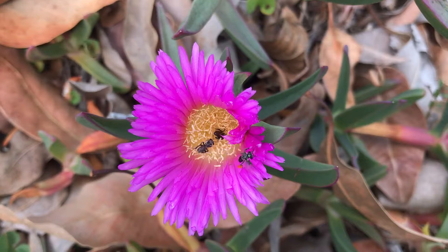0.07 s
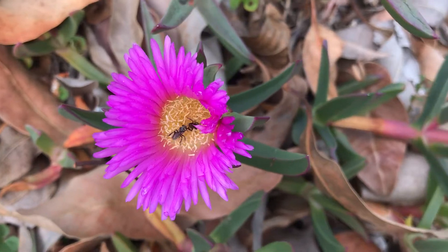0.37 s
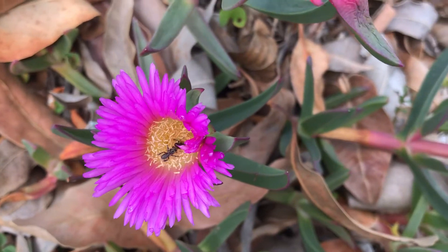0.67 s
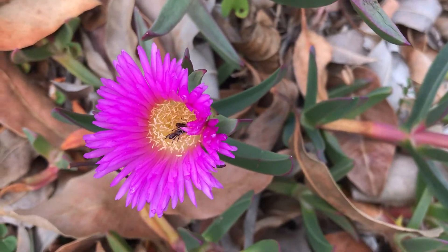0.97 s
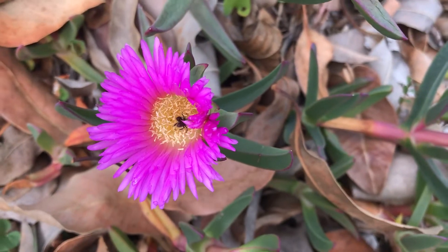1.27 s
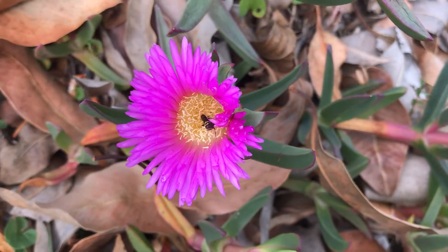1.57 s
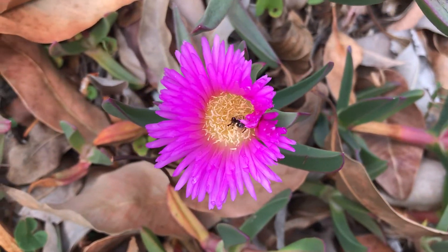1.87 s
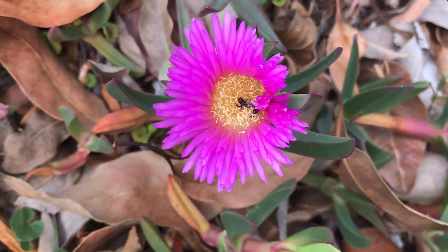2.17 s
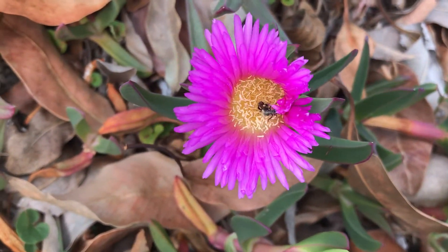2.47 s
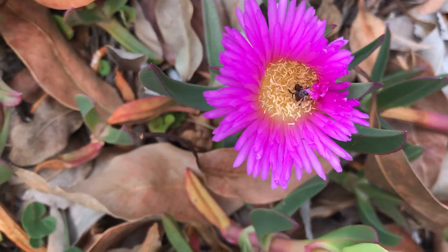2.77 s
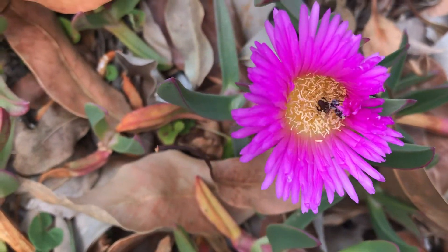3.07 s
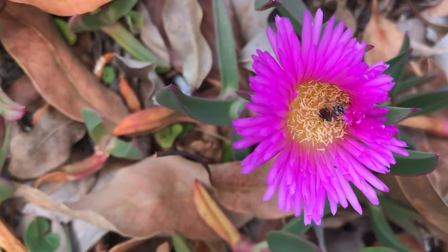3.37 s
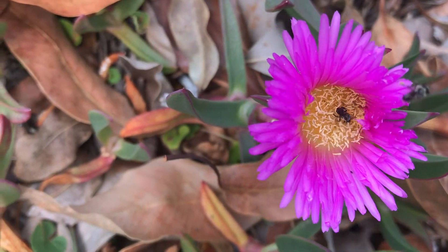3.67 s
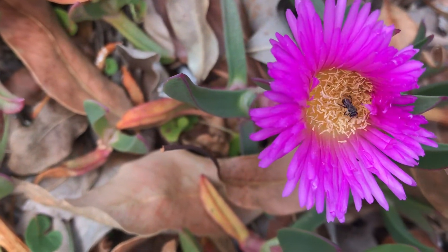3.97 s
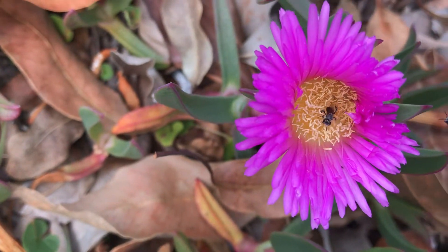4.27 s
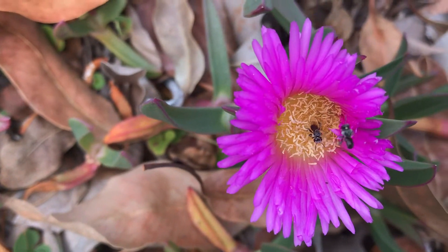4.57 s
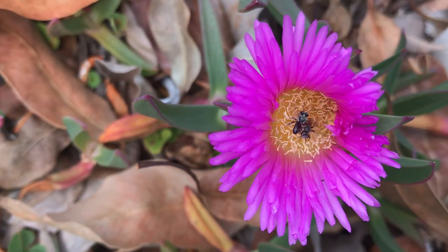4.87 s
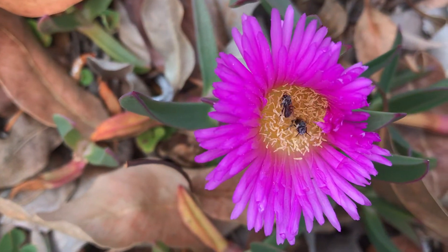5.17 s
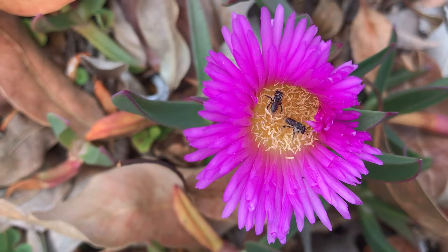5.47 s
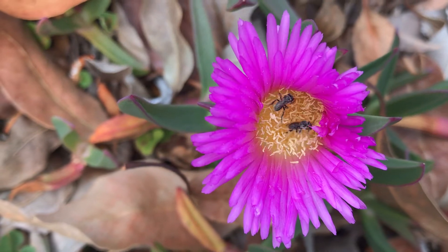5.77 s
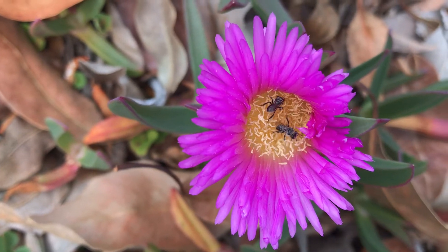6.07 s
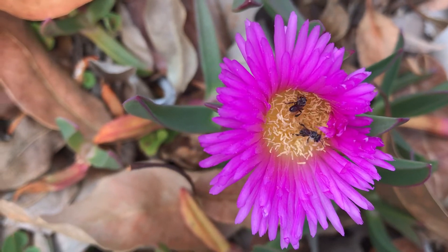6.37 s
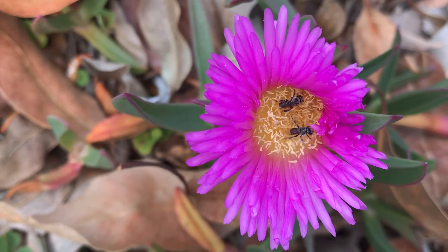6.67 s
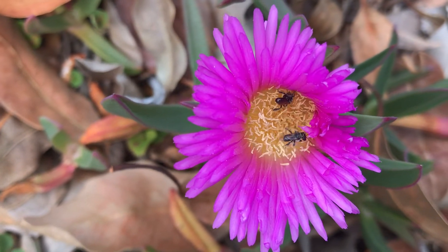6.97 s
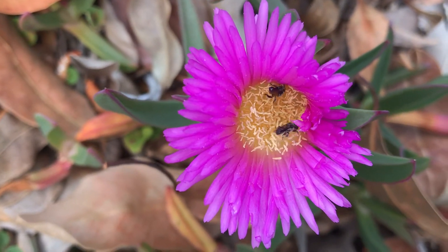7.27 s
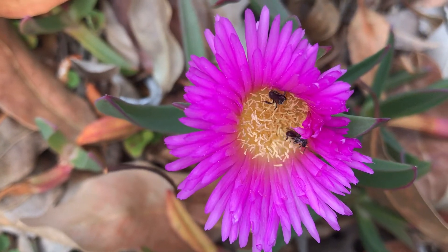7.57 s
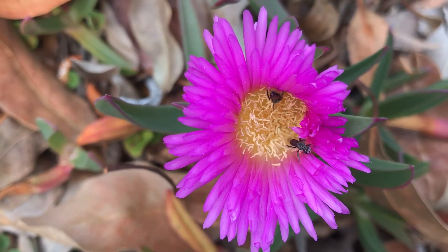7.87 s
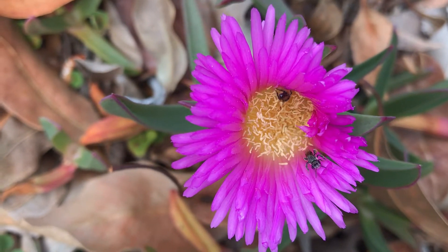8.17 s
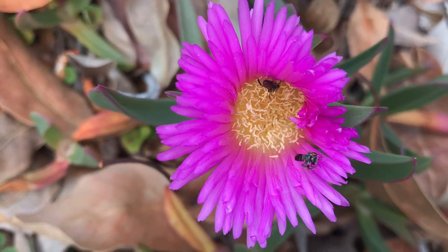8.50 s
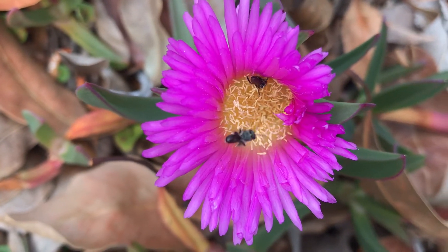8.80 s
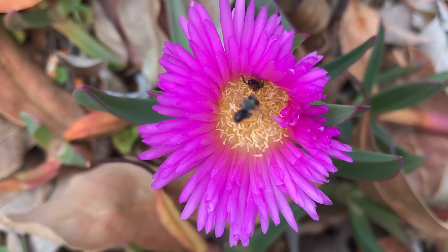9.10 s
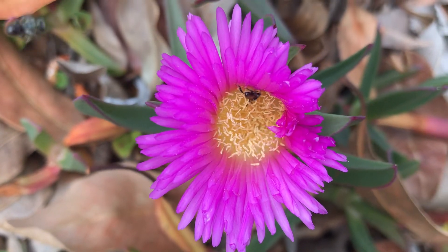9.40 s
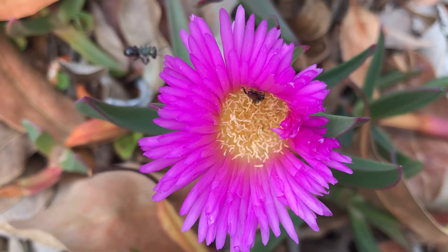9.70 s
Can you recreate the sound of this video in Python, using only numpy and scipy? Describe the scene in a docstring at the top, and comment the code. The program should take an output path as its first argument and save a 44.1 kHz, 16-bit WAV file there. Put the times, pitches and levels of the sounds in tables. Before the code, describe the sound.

A quiet garden opens on a passing vehicle, its low engine rumble, tyre roar and hiss peaking within the first second. A softer vehicle follows around 2 seconds, and the traffic gradually sinks into a steady murmur of far roads under a thin hiss. A small bird gives a quick cluster of clear chirps at about 1.3 seconds, with much fainter ones near 4, 6 and 8 seconds. Dry leaves tick and scrape very softly now and then, mostly between 1 and 3.5 seconds. From about 4 to 7 seconds a distant crow caws five times, faint and slightly echoing. At around 8.5 seconds a small bee takes off, its quiet, wavering buzz lasting to the end. Over it, a bird gives a short fluttering rasp at about 9.3 seconds, followed by one high chirp.

```python
"""Quiet garden with passing traffic

Engine rumble and tyre roar swell as vehicles pass, then sink into the murmur of far roads under a thin
hiss. Small birds whistle short chirps and one flutter-chopped rasp. Dry leaves tick and scrape, a far
crow caws through a resonant throat, and near the end a small bee takes off on buzzing wings."""
import sys
import numpy as np
from scipy import signal
from scipy.fft import rfft, irfft
from scipy.io import wavfile
from scipy.ndimage import uniform_filter1d

SR = 44100
rng = np.random.default_rng(int(sys.argv[2]) if len(sys.argv) > 2 else 0)


def file_out(sig):
    """Save sig as 16-bit WAV at sys.argv[1]."""
    # one column per channel
    cols = np.atleast_2d(sig).T
    # limit, then scale
    lim = np.clip(cols, -1, 1)
    pcm = np.round(lim * 32767).astype(np.int16)
    wavfile.write(sys.argv[1], SR, pcm)


N = 438354
TIME_S = np.arange(N) / SR

# vehicles: nearest t/s, time to cover the nearest distance/s, engine/dB, tyres/dB, deep rumble/dB
VEHICLES = [(.68, .48, -34, -43, -51), (2.3, 0.64, -47, -66, -58.5), (5.1, 0.64, -54.5, -74, -84),
            (8.3, 1.1, -67.5, -76, -60)]
# noise spectra: f/Hz, relative density/dB
DEEP_SPECTRUM = [(12, -32), (28, -14), (40, -6), (52, -1), (68, -5), (110, -35), (400, -73)]
ENGINE_NEAR = [(20, -41), (40, -29), (55, -14.5), (75, -8), (105, -4.5), (138, -9.5), (156, -9.5),
               (180, -7), (225, -8), (270, -15), (330, -16.5), (400, -20.5), (600, -35.5), (1200, -61)]
ENGINE_FAR = [(20, -37), (42, -18), (60, -3), (100, 0), (155, -6.5), (200, -3.5), (250, -12), (340, -12.5),
              (440, -26), (600, -20.5), (800, -33.5), (1200, -58)]
TYRE_NEAR = [(150, -44), (400, 2.5), (600, 0), (800, -1), (1150, 1.5), (1600, -3), (2500, -4), (3400, -13),
             (5500, -17.5), (8000, -28.5), (15000, -50)]
TYRE_FAR = [(150, -9.5), (400, 1), (600, -0.5), (820, -4.5), (1100, 0.5), (1350, -0.5), (1650, -1.5),
            (2100, -5.5), (2500, -6.5), (2800, -9.5), (4500, -17.5), (6300, -21), (8000, -28), (15000, -43)]
AIR_SPECTRUM = [(1500, -1.5), (4000, 3), (6300, 0.5), (7800, -3), (9600, 2), (10400, -5), (11500, 0),
                (13500, -3.5), (15800, -5.5)]
# engine drones: f/Hz, width/Hz, relative level/dB
DRONES = [(59.4, 1.1, -18), (97.2, 3.8, -8.5), (131.4, 19, -12.5), (217.5, 4.4, -9), (233.2, 3.5, -18)]
# tread whine: f/Hz, width/Hz, lift/dB
TREAD_PEAKS = [(875, 69, 4.5), (1087, 40, 5)]
# near vehicle's hiss: nearest t/s, time to cover the nearest distance/s, level/dB, loss per doubling/dB
HISS_PASS = (0.37, 0.2155, -52.5, 7)
# bird notes: t/s, length/s, start f/Hz, middle f/Hz, end f/Hz, level/dB, overtones/dB, roughness/0-1
CHIRPS = [(1.293, 0.047, 2755, 2836, 2680, -41, -25, 0.07), (1.335, .022, 2820, 2770, 2640, -50, -40, .3),
          (1.365, 0.0336, 3840, 3540, 3520, -47, -33, 0.54),
          (3.878, 0.0427, 2250, 2370, 2220, -61, -2.5, 0.6), (4.505, .035, 4370, 4550, 4450, -78, -30, .5),
          (5.92, 0.069, 2530, 2480, 2140, -72, -30, 0.15), (5.958, 0.07, 2240, 1740, 1500, -63.5, -30, 0),
          (6.01, .068, 3020, 2420, 2160, -70.5, -27, 0.78), (6.34, 0.055, 2190, 2464, 2420, -66, -5, 0.7),
          (7.769, 0.048, 2270, 2424, 2310, -64, -5, 0.6),
          (9.547, 0.0345, 3800, 4100, 4110, -56.5, -23, 0.33)]
# leaf scrapes: t/s, length/s, level/dB, centre f/Hz, width/octaves
LEAF_SCRAPES = [(1.339, 0.003, -58, 13000, 0.7), (1.372, 0.029, -62.5, 12000, 0.94),
                (1.8, .7, -82, 13000, 0.06), (1.923, 0.036, -68, 4500, .8), (2.108, 0.081, -64, 4940, 0.88),
                (2.335, .060, -72.5, 7500, .8), (2.5, 0.1, -69, 4500, 0.77), (2.892, 0.0041, -67, 7800, .4),
                (3.255, 0.0023, -58.5, 11000, 0.68), (3.515, .075, -76.5, 14000, 0.25),
                (3.52, .07, -76, 5536, .4), (4.592, 0.43, -80.5, 12900, .27),
                (4.648, 0.41, -82, 6000, 0.14), (6.622, .240, -83, 5960, .15),
                (6.888, 0.05, -77, 8500, 0.77), (8.588, .014, -80, 12000, 0.91),
                (8.612, 0.38, -91, 12000, .4)]
# caws: t/s, length/s, f/Hz, level/dB
CAWS = [(4.16, 0.16, 381, -71), (4.699, 0.22, 390, -71), (5.399, 0.16, 381, -67), (6.051, .18, 382, -65.5),
        (6.63, 0.19, 382.5, -65)]
# crow's throat response: f/Hz, gain/dB
CROW_THROAT = [(400, -35), (1150, -10), (1520, 2.5), (1920, -4), (2300, -16), (3100, -15)]
# wingbeat harmonics: multiple, relative level/dB
WING_HARMONICS = [(1, -0.5), (2, -7), (3, -17.5), (4, -27), (5, -24), (6, -38), (7, -23)]
# bee's darts: t/s, added wingbeat/Hz
DARTS = [(9.599, 14), (9.83, 16)]
# wall echoes: delay/s, level/dB
WALL_ECHOES = [(0.023, -27), (.098, -16), (.116, -20.5)]


def gain_of(db):
    """Decibels to amplitude."""
    return 10 ** (np.asarray(db) / 20)


def unit_rms(x):
    """Scales to rms 1."""
    return x / np.sqrt(np.mean(x ** 2) + 1e-20)


def spectrum_db(points, hz):
    """Interpolates a spectrum over log frequency."""
    points_hz, db = np.transpose(points)
    return np.interp(np.log(hz + 1), np.log(points_hz + 1), db)


def add(mix, start_s, sound):
    """Mixes a sound in at start_s."""
    part = mix[round(start_s * SR):][:len(sound)]
    part += sound[:len(part)]


def bump(centre_s, width_s):
    """Gaussian of height 1."""
    return np.exp(-.5 * ((TIME_S - centre_s) / width_s) ** 2)


def wander(rate_hz):
    """Smooth random drift, rms 1."""
    steps = 2 ** 15
    hz = np.fft.rfftfreq(steps, TIME_S[-1] / steps)
    slow = unit_rms(irfft(rfft(rng.standard_normal(steps)) * np.exp(-(hz / rate_hz) ** 2)))
    return np.interp(TIME_S, np.linspace(0, TIME_S[-1], steps), slow)


def noise(spectrum, patchy_db, peaks=(), size=1024):
    """Shaped noise, rms 1, with resonant peaks and drifting patches of level."""
    frames = dict(nperseg=size, noverlap=size * 3 // 4)
    hz, _, bins = signal.stft(rng.standard_normal(N), SR, **frames)
    patches = uniform_filter1d(rng.standard_normal(bins.shape), size=9, axis=0)
    patches = unit_rms(uniform_filter1d(patches, size=14, axis=1))
    peaks_db = sum(lift * np.exp(-.5 * ((hz - f) / width) ** 2) for f, width, lift in peaks)
    db = spectrum_db(spectrum, hz) + peaks_db
    shaped = bins * gain_of(db[:, None] + patchy_db * patches)
    return unit_rms(signal.istft(shaped, SR, **frames)[1][:N])


def passing(nearest_s, crossing_s, db, doubling_db):
    """Amplitude of a source at steady speed on a straight road; loses doubling_db per distance doubling."""
    distance = np.hypot(1, (TIME_S - nearest_s) / crossing_s)
    return gain_of(db - doubling_db * np.log2(distance))


def road(levels_db, doubling_db, lead_s=0):
    """Joint amplitude of all vehicles, summed in power."""
    return np.sqrt(sum(passing(nearest_s - lead_s, crossing_s, db, doubling_db) ** 2
                       for (nearest_s, crossing_s, *_), db in zip(VEHICLES, levels_db)))


def blend(near, far, near_share):
    """Equal-power fade between unrelated noises."""
    return np.sqrt(near_share) * near + np.sqrt(1 - near_share) * far


def deep_rumble():
    """Toneless rumble that swells and sinks with the vehicles."""
    *_, deep_db = np.transpose(VEHICLES)
    return road(deep_db, doubling_db=9) * noise(DEEP_SPECTRUM, patchy_db=.5, size=8192)


def drones():
    """Engines hum on a few notes that beat and drift in phase."""
    out = np.zeros(N)
    for hz, width_hz, db in DRONES:
        phase = 2 * np.pi * hz * TIME_S + wander(width_hz)
        out += gain_of(db) * unit_rms(np.sin(phase) * gain_of(2 * wander(width_hz)))
    return out


def engines(murmur_db=-61.5):
    """Drones blur into the steady murmur of far roads as the vehicles recede."""
    _, _, engine_db, _, _ = np.transpose(VEHICLES)
    droning = drones() + gain_of(-2) * noise(ENGINE_NEAR, patchy_db=.81, size=8192)
    murmur = noise(ENGINE_FAR, patchy_db=1.6, size=8192)
    rumble = blend(droning, murmur, np.interp(TIME_S, [3.2, 6.4, 7.6], [1, .6, 0]))
    return np.hypot(road(engine_db, doubling_db=6.5), gain_of(murmur_db)) * rumble


def tyres(lead_s=.12, waver_db=.23):
    """Tyre roar is thrown forward, so it peaks early; its colour changes as the vehicles recede."""
    _, _, _, tyre_db, _ = np.transpose(VEHICLES)
    near = gain_of(3) * noise(TYRE_NEAR, patchy_db=1)
    whining = noise(TYRE_FAR, patchy_db=1.7, peaks=TREAD_PEAKS, size=2048)
    plain = noise(TYRE_FAR, patchy_db=.93)
    far = gain_of(2) * blend(whining, plain, np.interp(TIME_S, [2.8, 5], [1, .2]))
    roar = blend(near, far, np.interp(TIME_S, [.8, 1.6], [1, 0])) * gain_of(waver_db * wander(8.8))
    return road(tyre_db, doubling_db=7, lead_s=lead_s) * roar


def air_hiss(steady_db=-78.5, step_s=8.57, added_db=-77.5):
    """Thin hiss: strong as the near vehicle passes, then steady, stepping up near the end."""
    power = passing(*HISS_PASS) ** 2 + gain_of(steady_db) ** 2
    power += gain_of(added_db) ** 2 * (TIME_S > step_s)
    return np.sqrt(power) * noise(AIR_SPECTRUM, patchy_db=.94)


def syrinx(hz, overtones_db, third_db):
    """Bird's whistle with second and third harmonics."""
    phase = 2 * np.pi * np.cumsum(hz) / SR
    overtones = np.sin(2 * phase) + gain_of(third_db) * np.sin(3 * phase)
    return np.sqrt(2) * (np.sin(phase) + gain_of(overtones_db) * overtones)


def chirps():
    """Each note bends through three pitches and drops at its end; rough ones shake in pitch and level."""
    out, pitch_drift, level_drift = np.zeros(N), wander(460), wander(390)
    for start_s, length_s, start_hz, middle_hz, end_hz, db, overtones_db, roughness in CHIRPS:
        progress = np.linspace(0, 1, int(length_s * SR))
        span = round(start_s * SR) + np.arange(len(progress))
        bend_hz = np.polyval(np.polyfit([0, .5, 1], [start_hz, middle_hz, end_hz], 2), progress)
        shake = .038 * roughness * (.7 - np.minimum(pitch_drift[span] ** 2, 4))
        drop = .14 * progress ** 18
        swell = signal.windows.tukey(len(span), .35) * gain_of(db + 4.5 * roughness * level_drift[span])
        add(out, start_s, swell * syrinx(bend_hz * (1 + shake - drop), overtones_db, third_db=-9))
    return out


def leaves(grain_db=1.8):
    """Dry leaves shift: single snaps and soft, grainy scrapes."""
    out, hz = np.zeros(N), np.fft.rfftfreq(2 * SR, 1 / SR)
    for start_s, length_s, db, centre_hz, octaves in LEAF_SCRAPES:
        white = rng.standard_normal(2 * SR)
        grains = gain_of(grain_db * np.repeat(rng.standard_normal(SR // 20), 40))
        band = np.exp(-.5 * (np.log2((hz + 1) / centre_hz) / octaves) ** 2)
        progress = np.linspace(0, 1, int(length_s * SR))
        scrape = irfft(rfft(white * grains) * band)[:len(progress)]
        add(out, start_s, gain_of(db) * unit_rms(scrape * np.sqrt(progress) * (1 - progress)))
    return out


def crow():
    """Hoarse harmonics on an arched pitch; only those near the throat's resonance carry this far."""
    out, drift = np.zeros(N), wander(109)
    for start_s, length_s, pitch_hz, db in CAWS:
        count = int(length_s * SR)
        arch = 1.025 - .075 * (2 * np.linspace(0, 1, count) - .7) ** 2
        hz = pitch_hz * (arch + .024 * drift[round(start_s * SR):][:count])
        phase = 2 * np.pi * np.cumsum(hz) / SR
        voice = sum(gain_of(spectrum_db(CROW_THROAT, k * hz)) * np.sin(k * phase) for k in range(1, 9))
        add(out, start_s, gain_of(db) * unit_rms(voice) * signal.windows.tukey(count, .45))
    return out


def bee(start_s=8.52, rise_s=.38, db=-64, wingbeat_hz=197.7, sag_hz_per_s=10, flutter_db=1.5):
    """The wingbeat sags after take-off, quickens for each dart and wavers in the hover."""
    age_s = np.maximum(TIME_S - start_s, 0)
    darts_hz = sum(lift_hz * bump(dart_s, width_s=.045) for dart_s, lift_hz in DARTS)
    hz = (wingbeat_hz - sag_hz_per_s * age_s + darts_hz) * (1 + .00719 * wander(17.8))
    phase = 2 * np.pi * np.cumsum(hz) / SR
    buzz = np.sqrt(2) * sum(gain_of(level_db) * np.sin(k * phase) for k, level_db in WING_HARMONICS)
    return buzz * gain_of(db + flutter_db * wander(9.6)) * np.minimum(age_s / rise_s, 1)


def rasp(start_s=9.331, length_s=.228, attack_s=.015, release_s=.02, db=-60,
         pitch_hz=2590, sag_hz_per_s=220, flutter_hz=205, pulse_db=2.5):
    """Uneven flutter sweeps and chops a bird's whistle; an early accent makes it louder and brighter."""
    age_s = TIME_S - start_s
    gate = np.clip(np.minimum(age_s / attack_s, (length_s - age_s) / release_s), 0, 1)
    accent_db = 5.3 * bump(start_s + .06, width_s=.03)
    dull_onset_db = 16 * np.exp(-abs(age_s) / .018)
    overtones_db = -1.5 + .7 * accent_db - dull_onset_db
    flutter_phase = 2 * np.pi * np.cumsum(flutter_hz * (1 + .14 * wander(130))) / SR
    hz = (pitch_hz - sag_hz_per_s * age_s) * (1 + .063 * np.sin(flutter_phase) + .015 * wander(357))
    flicker_db = 1.2 * wander(220)
    bright_db = 6 * (-np.sin(flutter_phase) - .5)  # brightest at the bottom of each sweep
    voice = syrinx(hz, overtones_db + bright_db + flicker_db, third_db=-19 + bright_db)
    return voice * gain_of(db + accent_db + pulse_db * np.cos(flutter_phase) + flicker_db) * gate


def garden_echo(sound, tail_db, t60_s, build_s=.0043):
    """Direct sound, wall echoes and a thin tail scattered by trees."""
    age_s = np.arange(SR) / SR
    tail = rng.standard_normal(SR) * gain_of(-60 * age_s / t60_s) * np.minimum(age_s / build_s, 1)
    response = gain_of(tail_db) * tail / np.linalg.norm(tail)
    response[0] = 1
    for delay_s, db in WALL_ECHOES:
        add(response, delay_s, gain_of([db]))
    return signal.fftconvolve(sound, response)[:N]


def scene():
    """Mono mix; the far crow has more echo than the small birds."""
    birds = garden_echo(chirps() + rasp(), tail_db=-10, t60_s=.61)
    birds += garden_echo(crow(), tail_db=-6, t60_s=.66)
    return (deep_rumble() + engines() + tyres() + air_hiss() + birds + leaves() + bee())[None]


def record(dry):
    """The sound cuts in with one brief stutter and is low-passed."""
    gate = ((TIME_S > .096) & (TIME_S < .109)) | (TIME_S > .120)
    fade_in = np.interp(TIME_S, [.1, .19], [.82, 1])
    lowpass = signal.firwin(511, cutoff=15850, window=("kaiser", 9), fs=SR)
    return signal.oaconvolve(dry * gate * fade_in, lowpass[None], "same")


dry = scene()
out = record(dry)
file_out(out)
```